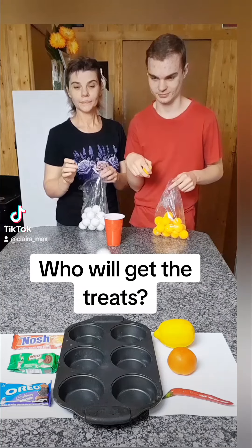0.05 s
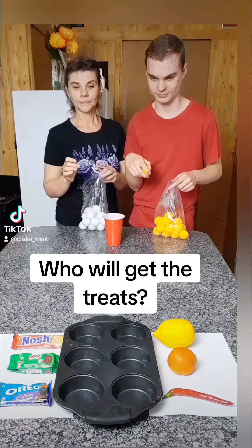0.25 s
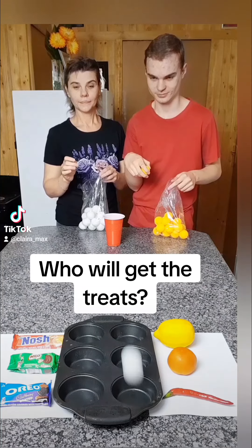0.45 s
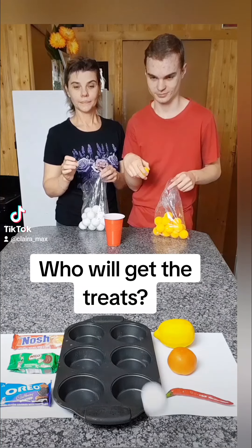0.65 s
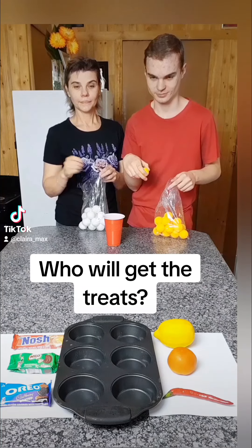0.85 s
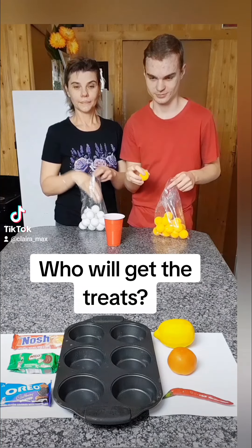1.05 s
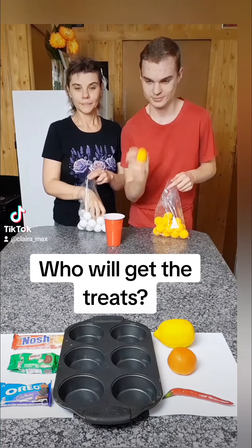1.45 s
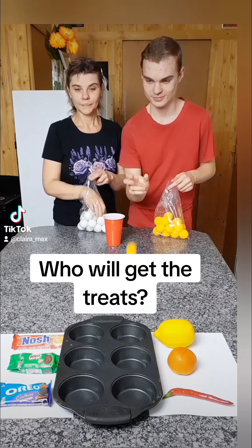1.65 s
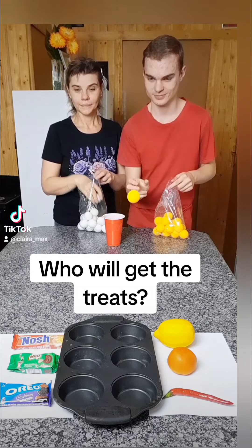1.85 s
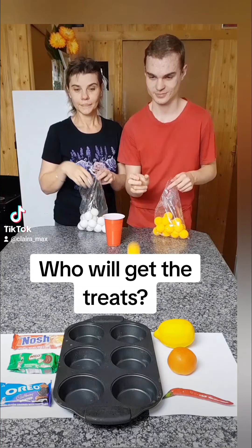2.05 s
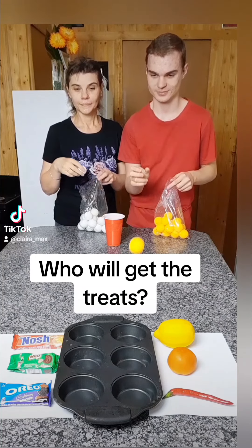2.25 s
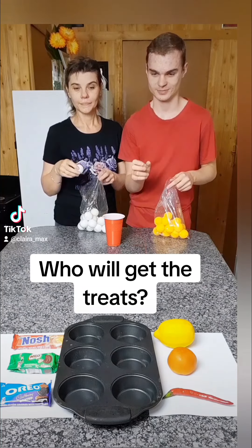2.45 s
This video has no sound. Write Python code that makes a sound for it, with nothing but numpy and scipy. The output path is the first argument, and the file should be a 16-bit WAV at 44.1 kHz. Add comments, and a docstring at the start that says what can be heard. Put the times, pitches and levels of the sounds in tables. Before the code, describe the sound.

Ping pong balls bounce in a small, hard room: two clangs on a metal tin, then quickening hollow clicks on stone near the microphone. Midway come a soft hiss and faint plastic rustle, then another ball knocks twice.

```python
"""Ping pong balls are thrown across a stone counter at a muffin tin in a small, hard room.
The first ball clangs twice on the tin, then bounces ever faster near the microphone. Each bounce is a
push of about half a millisecond, whose length cuts evenly spaced gaps in the tones of the shell's click.
Midway a soft hiss swells and a plastic bag rustles. Then a second ball lands with two fuller knocks,
and a few dull bumps sound near the end."""
import sys
import numpy as np
from scipy import signal
from scipy.fft import rfft, irfft
from scipy.io import wavfile

SR = 44100
rng = np.random.default_rng(int(sys.argv[2]) if len(sys.argv) > 2 else 0)


def transcribe(u):
    """Save the signal u as a 16-bit wav file named by the first command-line argument.

    u: samples, shape (n,) or (channels, n), limited to [-1, 1]; the rate is SR.
    q: integer samples, one column per channel.
    """
    v = np.clip(np.atleast_2d(u).T, -1, 1)
    q = np.round(v * 32767).astype(np.int16)
    wavfile.write(sys.argv[1], SR, q)


N = 110250
SIZE = 32768  # samples used to build one hit
HZ = np.fft.rfftfreq(SIZE, 1 / SR)
ECHO_S, ECHO_DB = .004, -12.5  # first echo from things on the counter


def bounce(surface, echo_db, contact_ms, level_db, thud_db, shell_db, room_db, pan_db, late_ms):
    """One bounce sounds the surface's thud, the ball's hollow pock and its shell's click."""
    # pock in the low tones, click in the high ones: (frequency [Hz], level [dB])
    ball_colour = [(40, -30), (90, -26), (160, -29.5), (260, -15), (450, -12), (800, -8.5), (1300, -8.5),
                   (2000, -8), (3000, -9), (4400, -14), (5800, -17.5), (7400, -6.5), (8700, -9),
                   (11500, -8.5), (14000, -13), (16000, -17)]
    thud_hz, shell_hz = 530, 3060
    thud = thud_db / (1 + (HZ / thud_hz) ** 3)
    shell = shell_db / (1 + (shell_hz / (HZ + 1)) ** 4)
    colour = tone_filter(level_db + curve(ball_colour, HZ) + thud + shell)
    sound = irfft(push(contact_ms) * colour * surface * room(echo_db, room_db, pan_db, late_ms))
    return sound[:, :SIZE * 3 // 4]


def push(contact_ms):
    """Spectrum of the ball's push, half a sine wave long, evened out so the highs stay strong."""
    phase, loss = 2 * np.pi * HZ * contact_ms / 1000, .2
    damped = loss + 1j * phase
    notches = (1 + np.exp(-damped)) / 2
    return notches * (np.pi + 1j * phase) ** 2 / (damped ** 2 + np.pi ** 2)


def tin_hits(mix):
    """The ball strikes the muffin tin twice, each time on a different spot."""
    # (ring [dB], favoured tone [Hz], first echo [dB], time [s], contact [ms], level [dB], thud [dB],
    #  shell click [dB], room [dB], left over right [dB], left delay [ms])
    hits = [ (0.45, 1300, -6, .2163, 0.4495, 4.87, 0.23, -5.4, 7.4, -4, 0.02),
            (6.2, 1890, 2.5, .4980, 0.5475, 6.7, -4.5, -6.4, 6.8, 0, 0.11)]
    for ring_db, spot_hz, echo_db, start, *blow in hits:
        add(mix, start, bounce(tin(ring_db, spot_hz), echo_db, *blow))


def tin(ring_db, spot_hz):
    """The struck spot gives a short clank and rings the tin's tones, most of all near spot_hz."""
    # the tin's own tones: (frequency [Hz], level [dB])
    tones = [(258, 0), (448, 1.5), (730, -37), (925, 1), (1030, -3), (1421, -4), (1537, -5), (1637, 2),
             (1710, -3), (1828, -1), (1894, 0), (1950, -8), (2062, -10.5), (2240, -16), (2670, 8.5),
             (3870, 11.5)]
    width_octaves, clank_db, far_db, ring_offset_db, fade_s = .27, 7, -12.5, -18, .16
    favour = np.exp(-(np.log2((HZ + 1) / spot_hz) / width_octaves) ** 2 / 2)
    struck = [(hz, db + far_db * (1 - np.interp(hz, HZ, favour)), fade_s) for hz, db in tones]
    return tone_filter(clank_db * favour) + gain(ring_db + ring_offset_db) * ringing(struck)


def counter_bounces(mix):
    """The balls bounce on stone; heavier thuds set the counter ringing more."""
    # (time [s], contact [ms], level [dB], thud [dB], shell click [dB], room [dB],
    #  left over right [dB], left delay [ms])
    bounces = [ (-.17, .48, 2.5, -3.5, -8.5, 9, 14, 0), (0.7654, 0.4, 9, -0.5, -0.5, 2, -1, 0.16),
               (.9857, 0.37, 8, 2, 2, 0, -2, 0.28), (1.182, .486, 11, 3, -1.5, -2.5, -0.5, 0.39),
               (1.3571, 0.46, 8, -1.5, -2.5, -2.5, 0.5, 0.4),
               (1.5023, 0.54, 5.5, 0, -3.5, -2.5, -2.5, 0.41),
               (1.6312, 0.46, 6, -2.5, -0.5, -3, -2.5, 0.39),
               (1.6649, 0.59, 14.5, -0.5, -6, 0.5, .5, 0.065), (1.7463, 0.42, 9, -2, -3, -4.5, 0, 0.39),
               (1.8370, .486, 4, 0, -2.5, -3.5, 1.5, 0.43), (1.9259, 0.5, -0.5, 3, -3, -2.5, -0.5, 0.34),
               (1.9966, 0.43, -1, 2, -6, -2, -2.5, 0.34), (2.0300, 0.54, -8, 3.5, 0, -23, -3.5, .35),
               (2.1084, 0.5, -5, 1, -2, -1, 2.5, .35), (2.1321, .51, 13, 3, -5.5, 3, -1, 0.11),
               (2.251, 0.52, -7, -1.5, -3.5, -4, -1.5, .35), (2.2760, 0.52, -9.5, -6, -14.5, 4, 3, 0.38),
               (2.2955, 0.49, -20.5, 6, -2.5, 4, 5.5, .35)]
    # the counter's own tones: (frequency [Hz], level [dB], time to fade by 60 dB [s])
    tones = [(307.6, 1.5, .2), (428, -5, 0.19), (450, -5, 0.033), (725.3, -2.5, 0.09), (840.3, -3, 0.073),
             (1182, -6.5, 0.18)]
    ring = ringing(tones)
    for start, contact_ms, level_db, thud_db, *rest in bounces:
        surface = 1 + gain(-25.5 + .47 * thud_db) * ring
        add(mix, start, bounce(surface, ECHO_DB, contact_ms, level_db, thud_db, *rest))


def ringing(tones):
    """Spectrum of a struck object: pure tones that each die away."""
    t, ring = np.arange(SIZE) / SR, 0
    for hz, db, fade_s in tones:
        tone = np.cos(2 * np.pi * hz * t) * 1000 ** (-t / fade_s)
        ring = ring + gain(db) * tone / np.linalg.norm(tone)
    return rfft(ring)


def bumps(mix):
    """Soft, low pushes with no click, which die away at once."""
    # (time [s], level [dB])
    pushes = [(1.997, -3), (2.020, -8.5), (2.375, -20)]
    pitch_hz, fade_s = 254.5, .015
    s, w = 2j * np.pi * HZ, 2 * np.pi * pitch_hz
    loss = 2 * np.log(1000) / fade_s
    resonance = loss * s / (s ** 2 + loss * s + w ** 2)
    dull = resonance / (1 + s / (2 * w))
    for start, level_db in pushes:
        sound = irfft(gain(level_db) * dull * room(ECHO_DB, room_db=-1.7))
        add(mix, start, sound[:, :SIZE // 2])


def bag():
    """A hand in a plastic bag makes many tiny crinkles, heard mostly through the room."""
    # (time [s], level [dB])
    loudness = [(.85, -75), (1.05, -78), (1.301, -77), (1.45, -56), (1.6, -73), (1.9, -72), (2.1, -89)]
    # (frequency [Hz], level [dB])
    colour = [(100, -31.5), (1000, -15.5), (4000, -1.5), (8000, -10), (15500, -5.5)]
    crinkles_per_s, spread_db = 900, 3.5
    sizes = gain(spread_db * np.minimum(rng.exponential(1, N), 4)) * rng.choice([-1, 1], N)
    clicks = sizes * (rng.random(N) < crinkles_per_s / SR)
    crinkle = irfft(tone_filter(curve(colour, HZ)) * room(ECHO_DB, room_db=0))
    rustle = signal.fftconvolve(clicks[None], crinkle, axes=1)[:, :N]
    level_db = np.interp(np.arange(N) / SR, *np.transpose(loudness), left=-np.inf, right=-np.inf)
    return rustle / rustle.std() * gain(level_db)


def room(echo_db, room_db, pan_db=0, late_ms=0):
    """Sound reaches the microphones straight, off nearby things, and off the walls."""
    # (frequency [Hz], time to fade by 60 dB [s])
    fade_times = [(100, 0.44), (300, 0.14), (700, 0.2525), (1500, 0.2651), (3000, 0.25), (8000, 0.3068),
                  (15000, 0.2077)]
    # tone of the echoing tail: (frequency [Hz], level [dB])
    tail_colour = [(100, 11), (400, 9), (1200, 0), (3000, 2.5), (8000, -3.5), (15000, 0)]
    near_db, near_fade_s, walls_s, before_walls_db, tail_left_db = 2, .041, .023, -6, .5
    t, side = np.arange(SIZE) / SR, np.array([[.5], [-.5]])
    near = echoes(every=6) * 1000 ** (-t / near_fade_s) * (t > .0005)
    near *= gain(near_db) / np.linalg.norm(near[0])
    hz, times, bands = signal.stft(echoes(every=10), SR, nperseg=256)
    decay = 1000 ** (-times / curve(fade_times, hz)[:, None])
    tail = signal.istft(bands * decay, SR)[1][:, :SIZE]
    tail *= gain(before_walls_db * (t < walls_s)) * np.minimum(t / ECHO_S, 1)
    tail *= gain(room_db + side * tail_left_db) / np.linalg.norm(tail[0])
    walls = mic_pair(rfft(tail), HZ) * tone_filter(curve(tail_colour, HZ))
    late_s = np.array([[late_ms], [0]]) / 1000  # left side only
    straight = np.exp(-2j * np.pi * HZ * late_s)
    first_echo = straight * gain(echo_db) * np.exp(-2j * np.pi * HZ * ECHO_S)
    return gain(side * pan_db) * (straight + first_echo + mic_pair(rfft(near), HZ)) + walls


def echoes(every):
    """One echo of random sign and timing in each run of `every` samples, per side."""
    out = np.zeros((2, SIZE))
    at = np.arange(0, SIZE - every, every)
    at = at + rng.integers(0, every, (2, len(at)))
    np.put_along_axis(out, at, rng.choice([-1, 1], at.shape), 1)
    return out


def air():
    """The still room and a soft hiss that comes and goes."""
    # (time [s], level [dB])
    hiss_level = [(0, -79), (0.902, -109), (1.05, -49), (1.137, -55), (1.154, -40), (1.18, -38),
                  (1.195, -50.5), (1.33, -68.5), (1.58, -64), (2.101, -78.5), (2.5, -78.5)]
    # both: (frequency [Hz], level [dB])
    hiss_colour = [(60, -28), (400, -4.5), (1500, -8.5), (3200, -11), (6000, -15), (9000, -16),
                   (15500, -16.5)]
    still_colour = [(20, -3.5), (70, 18.5), (170, 1), (500, -13), (1500, -17), (3000, -15), (6000, -20.5),
                    (10000, -16.5), (16000, -21)]
    hiss_db = np.interp(np.arange(N) / SR, *np.transpose(hiss_level))
    return gain(-74.5) * noise(still_colour) + gain(hiss_db) * noise(hiss_colour)


def noise(colour):
    """Stereo noise from all around, with this colour and a strength of one."""
    hz = np.fft.rfftfreq(N, 1 / SR)
    white = mic_pair(rfft(rng.standard_normal((2, N))), hz)
    coloured = irfft(white * gain(curve(colour, hz)), N)
    return coloured / coloured.std()


def mic_pair(spectra, hz):
    """Blends left and right: two close microphones hear much the same bass."""
    bass_alike, spacing_m = .62, .11
    blend = np.arcsin(bass_alike * np.sinc(2 * hz * spacing_m / 343)) / 2
    return np.cos(blend) * spectra + np.sin(blend) * spectra[::-1]


def tone_filter(db):
    """A filter with these levels that rings only after a sound, never before."""
    log_gain = np.log(gain(np.r_[db, db[-2:0:-1]]))
    return np.exp(np.conj(signal.hilbert(log_gain)))[:len(db)]


def gain(db):
    """Turns decibels into a multiplier."""
    return 10 ** (np.asarray(db) / 20)


def curve(points, hz):
    """Reads between a table's points, with frequency spaced by octaves."""
    known_hz, values = np.transpose(points)
    return np.interp(np.log(hz + 1), np.log(known_hz + 1), values)


def add(mix, start_s, sound):
    """Mixes a stereo sound in, cutting off what falls outside the scene."""
    at = round(start_s * SR)
    sound = sound[:, max(-at, 0):]
    part = mix[:, max(at, 0):][:, :sound.shape[1]]
    part += sound[:, :part.shape[1]]


def scene():
    """Clangs, bounces and bumps over the quiet room and the bag."""
    mix = air() + bag()
    tin_hits(mix)
    counter_bounces(mix)
    bumps(mix)
    return mix


def record(dry):
    """The right microphone is a little brighter; the deepest and highest tones are cut."""
    # right microphone against the left: (frequency [Hz], level [dB])
    right_colour = [(100, -1), (600, 0), (1500, 1), (2800, -1), (5000, 1), (14000, 0.5)]
    low_hz, high_hz = 38, 16100
    right = irfft(rfft(dry[1]) * gain(curve(right_colour, np.fft.rfftfreq(N, 1 / SR))), N)
    low_cut = signal.butter(2, low_hz, "high", fs=SR, output="sos")
    high_cut = signal.firwin(255, high_hz, window=("kaiser", 8), fs=SR)
    stereo = signal.sosfilt(low_cut, np.array([dry[0], right]))
    return signal.oaconvolve(stereo, high_cut[None], "same")


dry = scene()
out = record(dry)
transcribe(out)
```